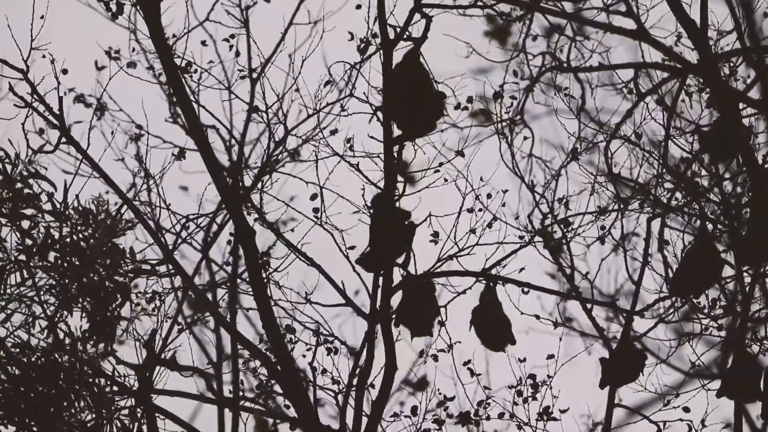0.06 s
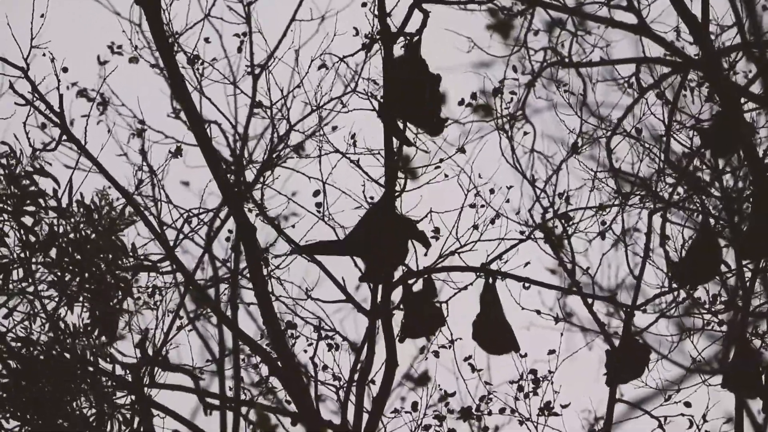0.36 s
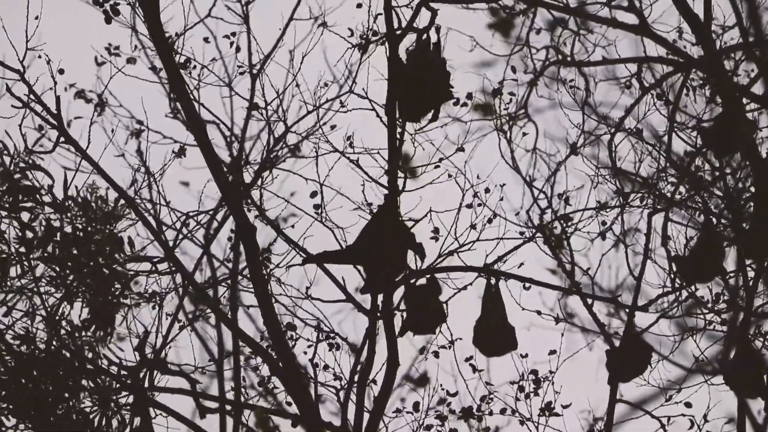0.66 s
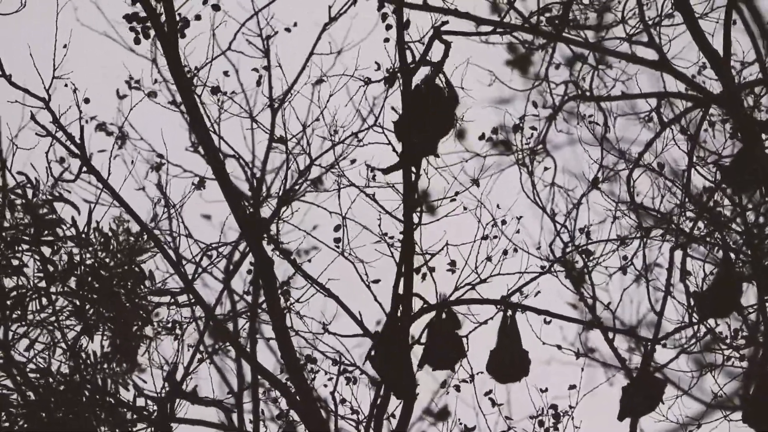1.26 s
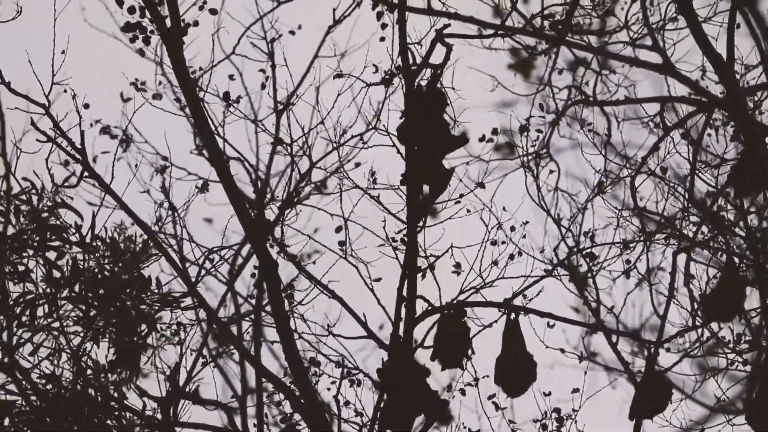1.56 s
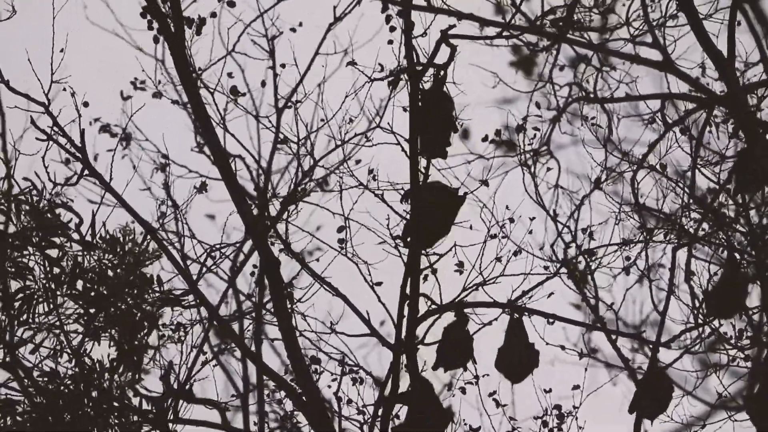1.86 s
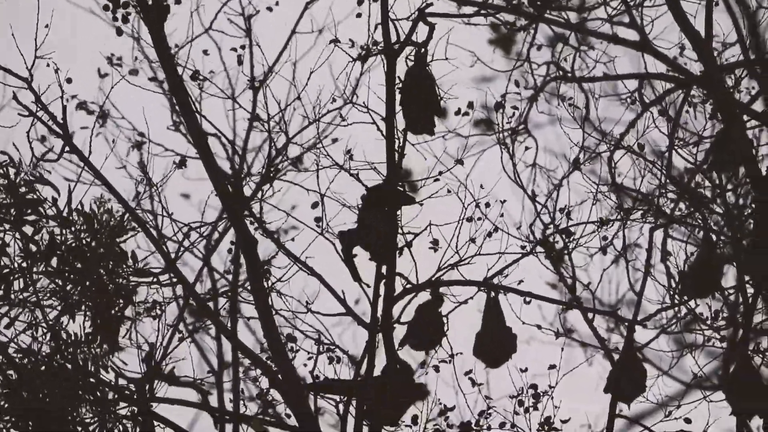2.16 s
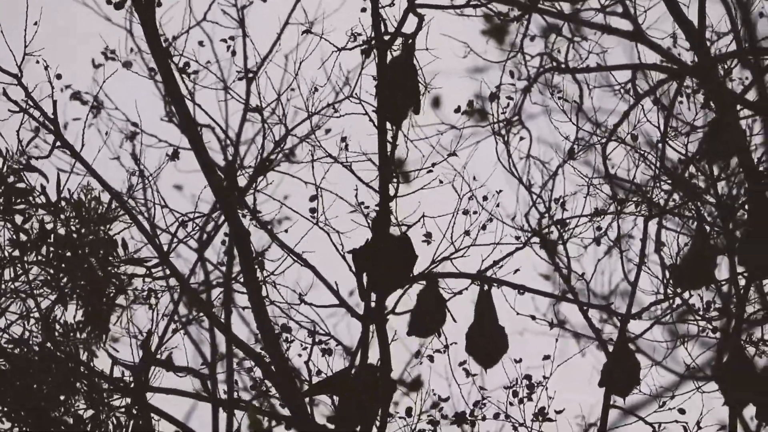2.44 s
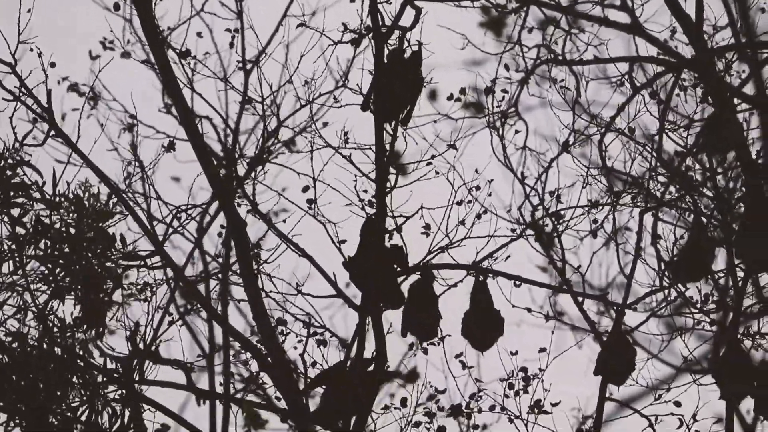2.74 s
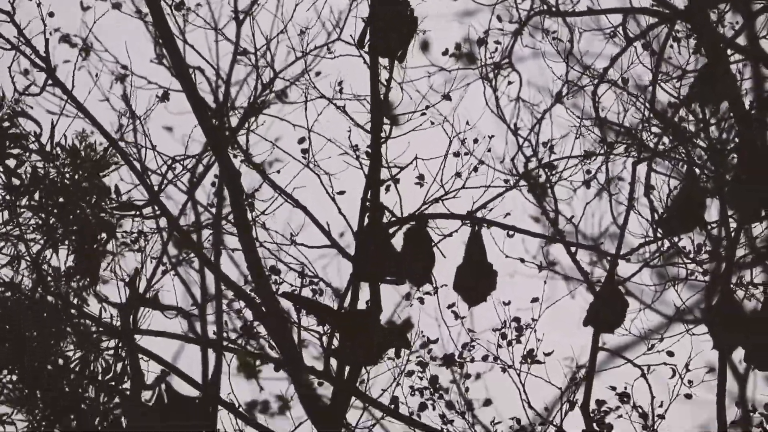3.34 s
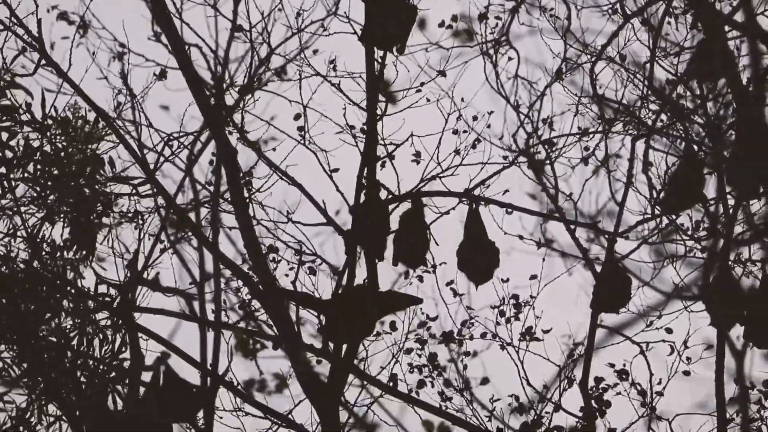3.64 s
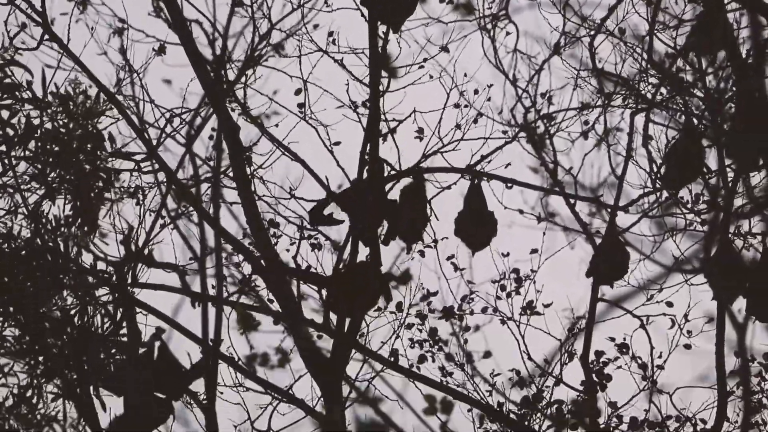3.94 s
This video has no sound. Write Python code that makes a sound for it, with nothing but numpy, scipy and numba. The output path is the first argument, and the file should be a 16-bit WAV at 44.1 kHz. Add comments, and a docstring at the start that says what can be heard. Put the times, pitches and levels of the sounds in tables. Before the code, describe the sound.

Bats squawk and screech in quick overlapping calls up in the trees, easing slightly before a few bright yelps. From the ground, the nearest voices stand out with a short echo against a distant colony and a faint low rumble.

```python
"""Harsh squawks and thin squeals burst out at once: flying foxes are squabbling in bare trees.
These near bats also spit short rasps and, toward the end, yelp. Squawks, rasps and yelps are the buzz
of an unsteady voice box ringing in the mouth; squeals are high, warbling tones. Many more bats call
farther off, and trunks scatter the sound over a low outdoor rumble, all heard in mono from the ground."""
import sys
import numpy as np
from scipy import signal
from scipy.fft import rfft, irfft
from scipy.io import wavfile
from scipy.ndimage import uniform_filter1d
from numba import njit

SR = 44100
rng = np.random.default_rng(int(sys.argv[2]) if len(sys.argv) > 2 else 0)


def wav_record(signal):
    """Record a signal, one row per channel, as 16-bit PCM in the file named by sys.argv[1]."""
    frames = np.transpose(np.atleast_2d(signal))
    bounded = np.clip(frames, -1, 1)
    # unit amplitude maps onto the largest positive 16-bit level
    quanta = np.round(bounded * 32767).astype(np.int16)
    wavfile.write(sys.argv[1], SR, quanta)


N = 176400

# Levels in the tables are relative. Roughness runs from 0 (clear) to 1 (hoarse).
# A resonance is a band of frequencies that rings more strongly than the rest.
# Near squawks: t/s, length/s, start pitch/Hz, end pitch/Hz, level/dB, roughness,
# mouth resonance f/Hz, its width/Hz, upper resonance level/dB
SQUAWK_CALLS = [ (-.02, 0.051, 537, 522, -20.5, 0.48, 2640, 470, -12.5),
                (0.17, 0.082, 564.5, 550, -32, 0.65, 2250, 800, -16),
                (0.288, 0.056, 478, 473.4, -25.5, 0.72, 3050, 1090, -10.5),
                (0.365, 0.049, 419, 448, -18.5, 0.62, 3660, 1430, -48),
                (0.402, 0.037, 441.4, 488, -21.5, 0.45, 4300, 1000, -44),
                (0.436, 0.046, 610, 569, -26.5, 0.53, 4870, 700, -45),
                (0.441, 0.11, 473, 508, -28.5, 0.44, 3180, 650, -18),
                (0.538, 0.058, 425.6, 389, -27.5, 0.9, 3100, 1590, -40),
                (0.625, 0.037, 439, 433, -25.5, 0.7, 3020, 1230, -26),
                (0.689, 0.06, 507.7, 479.6, -25.5, 0.24, 3200, 596, -10.5),
                (.805, 0.14, 489, 521, -31.5, 0.26, 3240, 560, -15),
                (0.932, 0.11, 484, 484.5, -32, 0.29, 3240, 700, -20),
                (1.197, 0.19, 451.7, 466, -29, 0.78, 3190, 1070, -22),
                (1.351, 0.11, 475.4, 484, -31, 0.46, 3430, 1290, -6),
                (1.651, 0.078, 539, 558, -28, 0.21, 3040, 890, -40),
                (1.733, 0.14, 425, 425.7, -31, 0.62, 2420, 1390, -36),
                (1.921, 0.16, 495.6, 484, -29.5, 0.65, 3010, 760, -33),
                (2.154, 0.15, 472, 466, -35.5, 0.2, 3200, 710, -6.5),
                (2.342, 0.27, 521.6, 494.6, -31.5, 0.22, 2920, 900, -37),
                (2.534, 0.11, 523.5, 490, -30, 0.47, 2830, 1060, -40),
                (2.629, 0.048, 479, 453, -27.5, 0.37, 2700, 890, -30),
                (2.678, 0.11, 544, 494, -31.5, 0.38, 2130, 894, -36),
                (2.755, 0.062, 483.4, 503.5, -28.5, 0.2, 2840, 1580, -40),
                (3.069, 0.049, 533, 530, -24, 0.24, 2980, 890, -43),
                (3.119, 0.16, 529, 513.6, -25, 0.58, 3000, 810, -59),
                (3.265, 0.14, 523, 501, -27, 0.64, 3070, 920, -30),
                (3.663, 0.051, 493, 543, -31.5, 0.83, 2860, 1390, -8),
                (3.691, 0.101, 536, 525.4, -30.5, 0.2, 2600, 590, -25),
                (3.785, 0.21, 514, 516, -31.5, 0.18, 3500, 900, -20),
                (3.841, 0.1, 520, 509.6, -27, 0.13, 2480, 580, -38),
                (3.956, 0.035, 516, 504, -30, 0.05, 2440, 600, -30)]
# Near squeals: t/s, length/s, start pitch/Hz, end pitch/Hz, level/dB, roughness, overtone level/dB
SQUEAL_CALLS = [ (.0, 0.035, 2750, 2680, -28, 0.2, -24), (0.08, 0.046, 3076, 3610, -33.5, 0.5, -29),
                (0.243, 0.026, 2890, 3410, -34, 0.4, -38), (0.318, 0.022, 2900, 2690, -27, 0.54, -22),
                (0.696, 0.053, 3030, 3050, -35.5, 0, -25), (.825, 0.11, 3310, 3624, -34, 0, -31),
                (1.239, 0.039, 1946, 2220, -32, 0.9, -16), (1.287, 0.047, 2110, 2364, -30, 0.65, -11),
                (1.363, 0.027, 2403, 2445, -27.5, 0.25, -8.5), (1.412, 0.035, 2260, 2380, -32, .45, -6),
                (1.463, 0.0096, 2342, 2300, -23, 0.26, -12), (1.614, 0.056, 2977, 3320, -35.5, 0.48, -29),
                (1.859, 0.044, 3370, 2930, -39, 0, -24), (2.009, 0.036, 2307, 2400, -33, 0.84, -13),
                (2.176, 0.074, 3390, 3190, -59, 0.2, -30), (2.268, 0.0357, 2310, 2446, -35.5, 1, -8.5),
                (2.361, 0.078, 3180, 2960, -40, 0.3, -27), (2.534, 0.11, 3760, 3310, -32, 0.33, -34),
                (2.669, 0.052, 2190, 2004, -37.5, 0.75, -21), (3.095, 0.054, 1843, 1876, -31, 0.18, -10),
                (3.139, 0.12, 1768, 1875, -38.5, 0.82, -14), (3.246, 0.043, 1647, 1372, -37.5, 0.63, -11),
                (3.654, 0.014, 3280, 3800, -35, 0.3, -20)]
# Overtones of a squeal: multiple of the pitch, level/dB
OVERTONES = [(2, -8), (3, 3.5), (4, -7), (5, -8.5)]
# Near rasps: t/s, length/s, level/dB, centre f/Hz, width/Hz
RASP_CALLS = [ (0, 0.065, -33.5, 5900, 2500), (0.31, 0.056, -33, 7100, 2800),
              (0.626, 0.03, -36, 6600, 6040), (0.695, 0.03, -34, 5540, 4630),
              (0.821, 0.043, -37.5, 8450, 5030), (0.842, 0.021, -30, 5000, 6000),
              (0.883, 0.032, -32.5, 4600, 2180), (0.951, 0.026, -36, 5500, 4500),
              (1.013, 0.034, -35.5, 7100, 4900), (1.129, 0.027, -32.5, 6400, 3560),
              (1.23, 0.062, -35, 8060, 2460), (1.294, 0.22, -40.5, 7900, 3520),
              (1.51, 0.08, -40, 6150, 1840), (1.859, 0.031, -43, 7000, 5000),
              (2.025, 0.14, -41, 6600, 3600), (2.28, 0.053, -38.5, 6850, 4000),
              (2.642, 0.049, -38, 7540, 3950), (2.794, 0.021, -37.5, 7400, 3000),
              (3.143, 0.097, -44, 9600, 2000)]
# The course of each yelp, one list per call: t/s, pitch/Hz, level/dB, mouth resonance f/Hz, roughness
YELP_PATHS = [
    [(2.868, 618, -37, 2500, 0.2), (2.885, 678, -38.5, 2670, 0.25), (2.925, 766, -38, 2830, 0.2),
     (2.955, 756, -36, 2900, 0), (3.0, 687, -37.5, 2670, 0.37), (3.02, 663, -38.5, 2440, 0.3),
     (3.07, 548, -38.5, 1690, 0.65)],
    [(3.468, 560, -36, 2280, 0.4), (3.507, 690, -40, 2870, 0.34), (3.555, 661, -37, 3050, .1),
     (3.59, 655, -38.5, 2700, 0), (3.62, 640, -46, 2670, 0.1)],
    [(3.492, 601, -32, 1810, 0.7), (3.516, 768, -34.5, 2400, 0.85), (3.54, 735, -33.5, 2220, 0.78),
     (3.563, 626, -32, 2010, 0.94), (3.572, 620, -51, 1910, 0.7)],
]
# Upper resonances of a yelp: f/Hz, width/Hz, level/dB
YELP_RESONANCES = [(6300, 1150, 11.5), (7350, 1400, 6)]
# Tone colour of the far bats: f/Hz, level/dB
COLONY_SPECTRUM = [(450, -19.5), (700, -17.5), (1390, -10.5), (3070, 1.5), (4190, -3.5), (6260, -8.5),
                   (8990, -12.5), (12800, -28), (15500, -35)]
# Loudness of the far bats over time: t/s, level/dB
COLONY_LEVELS = [(0, -29.5), (.25, -30.5), (.95, -29), (1.6, -33), (2.2, -33.5), (2.85, -34.5),
                 (3.349, -34.5), (3.64, -35), (4, -37)]
# Tone colour of the rumble: f/Hz, level/dB
RUMBLE_SPECTRUM = [(25, -17), (86, -1), (118, -2.5), (289, -1), (525, -5), (670, -9),
                   (813, -8), (1200, -1), (1560, -12), (2640, -120)]

ATTACK_S, RELEASE_S = 0.0092, 0.0211  # fade in, fade out
JITTER_HZ, WARBLE_HZ, WAVER_HZ = 602.8, 74.5, 60.4  # how fast the voice wobbles
FLUTTER_DB, FLUTTER_HZ = 3.5, 222  # random trembling of loudness, at full roughness
STUTTER_DB, STUTTER_HZ = 12.5, 97.7  # bursts in a squeal, at full roughness


def squawk(length, hz0, hz1, rough, mouth_hz, width, upper_db):
    """A harsh, nasal cry: the voice box rings a moving mouth resonance and a weak upper one."""
    t, hz, envelope = call_shape(length, hz0, hz1, arch=0.092 * rough)
    buzz = voice_box(t, hz, rough)
    # The mouth opens with the pitch and is never still.
    centre = mouth_hz * (hz / hz.mean()) * np.exp(0.049 * wobble(t, WAVER_HZ))
    voice = moving_mouth(moving_mouth(buzz, centre, width * 1.5), centre, width * 1.5)
    voice += undb(-21.5) * resonate(buzz, mouth_hz, mouth_hz)  # some buzz leaks past
    voice -= undb(upper_db) * steep_resonance(buzz, hz=6900, width=2600)
    nasal = signal.sosfilt(signal.butter(4, 1550, "high", fs=SR, output="sos"), voice)
    chest = steep_resonance(buzz, hz0, hz0 / 2)
    return (unit(nasal) + undb(-32) * unit(chest)) * envelope


def voice_box(t, hz, rough):
    """Sharp pulses, each with a puff of air; a rough voice stumbles in timing and strength."""
    jitter = 0.0689 * wobble(t, JITTER_HZ)
    waver = 0.02093 * wobble(t, WAVER_HZ)
    hz = hz * np.exp(rough * (jitter + waver))
    cycles = np.cumsum(hz) / SR
    offset = (cycles - np.round(cycles)) * SR / hz  # samples from the nearest pulse
    pulses = np.sinc(offset) * np.exp(-(offset / 5) ** 2)
    air = noise(len(t)) * np.exp(-(cycles % 1) / 0.85)
    return (unit(pulses) + rough * unit(air)) * flutter(t, rough, FLUTTER_HZ)


@njit
def moving_mouth(x, hz, width):
    """The mouth as a resonance that slides as it opens and closes."""
    out, band_state, low_state = np.empty(len(x)), 0., 0.
    for i in range(len(x)):
        tuning, damping = np.tan(np.pi * hz[i] / SR), width / hz[i]
        band = (band_state + tuning * (x[i] - low_state)) / (1 + tuning * (tuning + damping))
        band_state = 2 * band - band_state
        low_state += 2 * tuning * band
        out[i] = damping * band
    return out


def call_shape(length, hz0, hz1, arch):
    """Time, pitch and loudness of one call: the pitch glides, bowing upward in the middle."""
    t = np.arange(int((max(length, ATTACK_S) + RELEASE_S / 2) * SR)) / SR
    progress = t / t[-1]
    glide = hz0 + (hz1 - hz0) * progress
    bow = 1 + arch * (0.5 - (2 * progress - 1) ** 2)
    envelope = np.clip(t / ATTACK_S, 0, 1) * np.clip((t[-1] - t) / RELEASE_S, 0, 1)
    return t, glide * bow, envelope


def squeal(length, hz0, hz1, rough, overtone_db):
    """The voice breaks upward into a high, warbling note; a rough one stutters in uneven bursts."""
    t, hz, envelope = call_shape(length, hz0, hz1, arch=0.0261)
    hz = hz * np.exp(0.0158 * wobble(t, WARBLE_HZ) + 0.072 * rough * wobble(t, rate=898))
    phase = 2 * np.pi * np.cumsum(hz) / SR
    tone = np.sin(phase) + sum(undb(overtone_db + db) * np.sin(k * phase) for k, db in OVERTONES)
    burst_hz = STUTTER_HZ * np.exp(wobble(t, STUTTER_HZ) / 2)
    bursts = undb(rough * STUTTER_DB * np.sin(2 * np.pi * np.cumsum(burst_hz) / SR))
    return envelope * unit(tone * bursts * flutter(t, rough, JITTER_HZ))


def rasp(length, centre_hz, width):
    """A short, bright, spitting screech, part hoarse voice and part hiss."""
    t, hz, envelope = call_shape(length, hz0=328.5, hz1=328.5, arch=0.046)
    breathy = unit(voice_box(t, hz, rough=0.98)) + undb(-6) * noise(len(t))
    broad = resonate(breathy, centre_hz, centre_hz)
    return envelope * unit(steep_resonance(broad, centre_hz, width) + undb(-11.5) * broad)


def yelp(path):
    """A bright call that rises and falls as the mouth opens and closes."""
    times, *columns = np.array(path).T
    t = np.arange(int((times[-1] - times[0]) * SR)) / SR
    hz, db, mouth_hz, rough = (np.interp(t + times[0], times, column) for column in columns)
    buzz = voice_box(t, hz * np.exp(0.007 * wobble(t, WARBLE_HZ)), 0.3 * rough)
    mouth = unit(moving_mouth(buzz, mouth_hz, width=420.))
    mouth += undb(3) * rough * unit(moving_mouth(buzz, 2.03 * mouth_hz, width=420.))
    upper = np.zeros(len(t))
    for centre_hz, width, peak_db in YELP_RESONANCES:
        breathy = (1 - rough) * buzz + rough * noise(len(t))
        upper += undb(peak_db) * steep_resonance(breathy, centre_hz, width)
    hiss = steep_resonance(noise(len(t)), hz=12200, width=6100)
    treble = (1 - rough / 2) * unit(upper) + undb(-12) * rough * unit(hiss)
    phase = 2 * np.pi * np.cumsum(hz) / SR
    chest = np.sin(phase) + 2 * rough * np.sin(2 * phase)
    fade = np.minimum(np.minimum(t, t[-1] - t) / ATTACK_S, 1)
    envelope = fade * undb(db) * flutter(t, rough, FLUTTER_HZ)
    return (undb(-2) * mouth + undb(1.5) * treble + undb(-15.5) * chest) * envelope


def colony(count=160):
    """Farther bats squawk and squeal over one another; the farthest blur into a hiss."""
    calls = np.zeros(N + SR)
    for k, (when, size, pitch, glide, loud, mouth) in enumerate(rng.uniform(-1, 1, (count, 6))):
        start = (k + when - 2) / (count - 2) * N / SR
        length = 0.06 * np.exp(0.5 * size)
        hz, bend = 480 * np.exp(0.5 * pitch), np.exp(0.2 * glide)
        mouth_hz = 3100 * np.exp(0.31 * mouth)
        cry = squawk(length, hz, hz * bend, rough=0.55, mouth_hz=mouth_hz, width=1170, upper_db=-18)
        add(calls, start, undb(4 * loud) * cry)
        if k % 2:
            high_hz = 2850 * np.exp(0.28 * pitch)
            cry = squeal(length / 2, high_hz, high_hz / bend, rough=0.275, overtone_db=-50)
            add(calls, start, undb(1 + loud) * cry)
    # Even out lows and highs, then give the whole crowd one tone colour.
    spectrum = rfft(calls)
    power = uniform_filter1d(np.abs(spectrum) ** 2, size=3000)
    even = unit(irfft(spectrum / np.sqrt(np.abs(power) + 1e-12), len(calls)))
    crowd = colour(even + undb(-5.5) * noise(len(calls)), COLONY_SPECTRUM)
    level_db = np.interp(np.arange(N) / SR, *np.array(COLONY_LEVELS).T)
    return unit(trees(crowd[:N], echo_db=-6)) * undb(level_db)


def trees(x, echo_db, decay_s=0.66, onset_s=0.002, dull_hz=7900):
    """Trunks and branches add a short, grainy echo, duller than the direct sound."""
    t = np.arange(SR) / SR
    grains = noise(SR) ** 3
    tail = grains * undb(-60 * t / decay_s) * np.clip(t / onset_s, 0, 1)
    pole = np.exp(-2 * np.pi * dull_hz / SR)
    tail = signal.lfilter([1 - pole], [1, -pole], tail / np.linalg.norm(tail))
    return x + undb(echo_db) * signal.fftconvolve(x, tail)[:N]


def rumble():
    """The steady, low noise of the outdoors."""
    return unit(colour(noise(N), RUMBLE_SPECTRUM))


def undb(db):
    """Turn decibels into a multiplier."""
    return 10 ** (np.asarray(db) / 20)


def unit(x):
    """Scale a sound to an average power of 1."""
    return x / np.sqrt(np.mean(x ** 2) + 1e-18)


def noise(size):
    """Fresh white noise, an even hiss."""
    return np.random.default_rng(rng.integers(2 ** 30)).standard_normal(size)


def wobble(t, rate):
    """Random values, `rate` of them a second, joined by straight lines."""
    points = noise(700)
    return np.interp(t * rate, np.arange(len(points)), points)


def flutter(t, rough, rate):
    """A trembling loudness, deeper for a rougher voice."""
    return undb(FLUTTER_DB * rough * np.tanh(wobble(t, rate)))


def colour(x, points):
    """Shape lows and highs with a curve of (f/Hz, level/dB) that falls away beyond its ends."""
    hz, db = np.array(points).T
    f = np.maximum(np.arange(len(x) // 2 + 1) * SR / len(x), 1)
    edges = np.minimum(f / hz[0], 1) ** 2 * np.minimum(hz[-1] / f, 1) ** 4
    curve = undb(np.interp(np.log(f), np.log(hz), db))
    return irfft(rfft(x) * edges * curve, len(x))


def resonate(x, hz, width):
    """One resonance: its centre passes unchanged and the rest is weakened."""
    angle = 2 * np.pi * hz / SR
    damping = np.sin(angle) * width / (2 * hz)
    return signal.lfilter([damping, 0, -damping], [1 + damping, -2 * np.cos(angle), 1 - damping], x)


def steep_resonance(x, hz, width):
    """Two wider resonances in a row act as one with steeper sides."""
    return resonate(resonate(x, hz, width * 1.5), hz, width * 1.5)


def add(out, start, x):
    """Mix a sound in at `start` seconds."""
    i = int(start * SR)
    first, end = max(i, 0), min(i + len(x), N)
    if end > first:
        out[first:end] += x[first - i:end - i]


def scene():
    """Near voices among the trees, the far colony and the rumble, alike in both channels."""
    squawks, squeals, rasps, yelps = np.zeros((4, N))
    for start, length, hz0, hz1, db, rough, mouth_hz, width, upper_db in SQUAWK_CALLS:
        add(squawks, start, undb(db) * squawk(length, hz0, hz1, rough, mouth_hz, width, upper_db))
    near = undb(-4) * trees(squawks, echo_db=-4.5)
    for start, length, hz0, hz1, db, rough, overtone_db in SQUEAL_CALLS:
        add(squeals, start, undb(db) * squeal(length, hz0, hz1, rough, overtone_db))
    near += trees(squeals, echo_db=-4.5)
    for start, length, db, centre_hz, width in RASP_CALLS:
        add(rasps, start, undb(db) * rasp(length, centre_hz, width))
    near += undb(0.5) * trees(rasps, echo_db=-10)
    for path in YELP_PATHS:
        add(yelps, path[0][0], yelp(path))
    near += trees(yelps, echo_db=-2)
    mono = near + undb(-52) * rumble() + undb(-1.22) * colony()
    return np.array([mono, mono])


def record(dry):
    """Cut away the highest treble, above 15700 Hz."""
    return signal.sosfilt(signal.ellip(10, .1, 80, 15700, fs=SR, output="sos"), dry)


dry = scene()
out = record(dry)
wav_record(out)
```